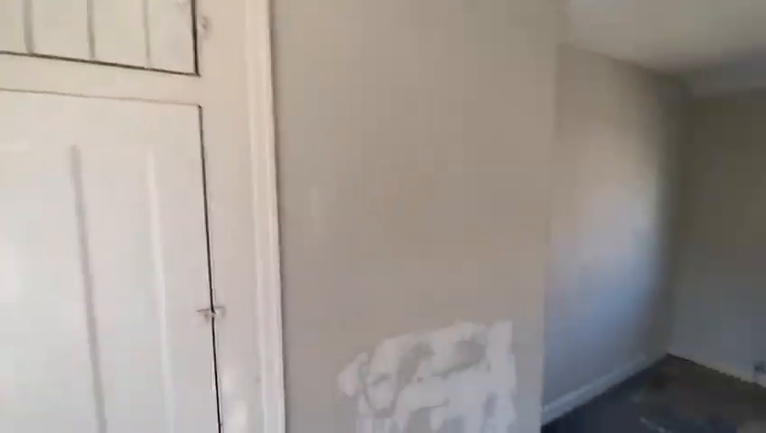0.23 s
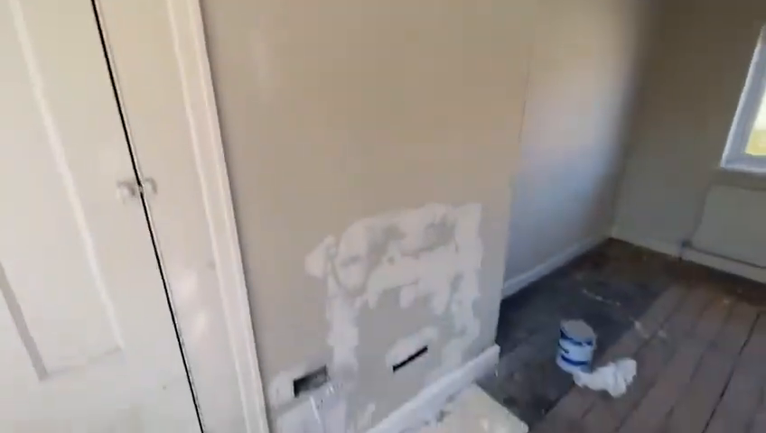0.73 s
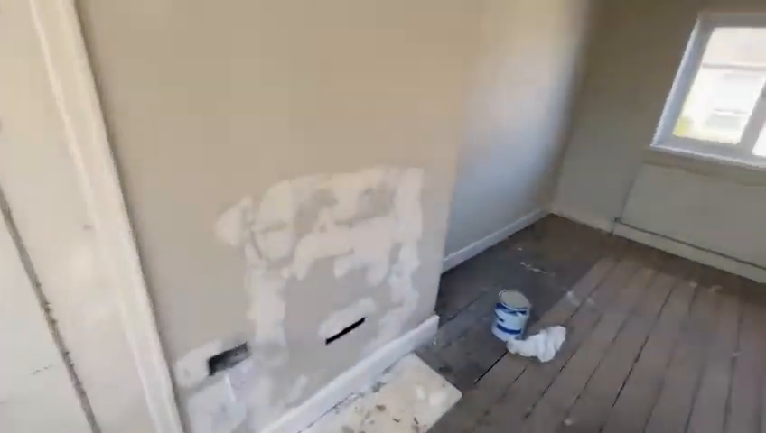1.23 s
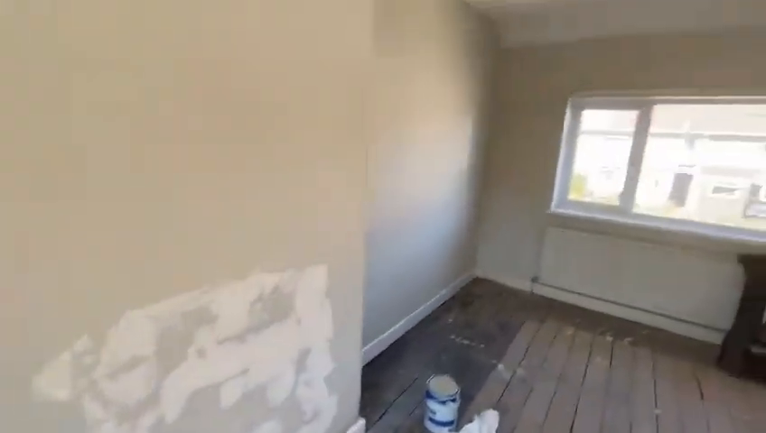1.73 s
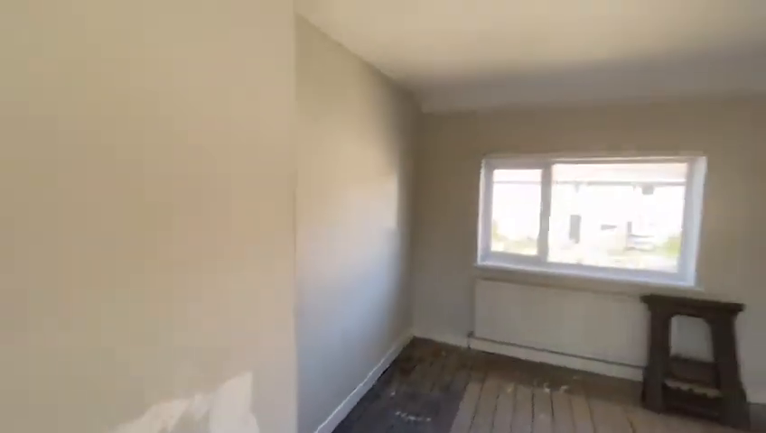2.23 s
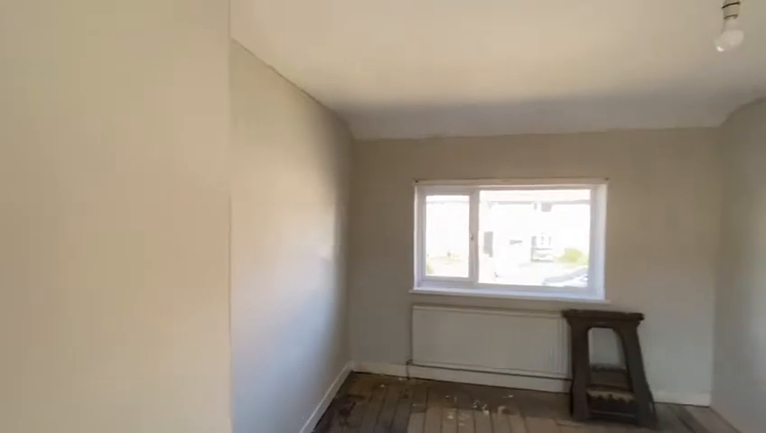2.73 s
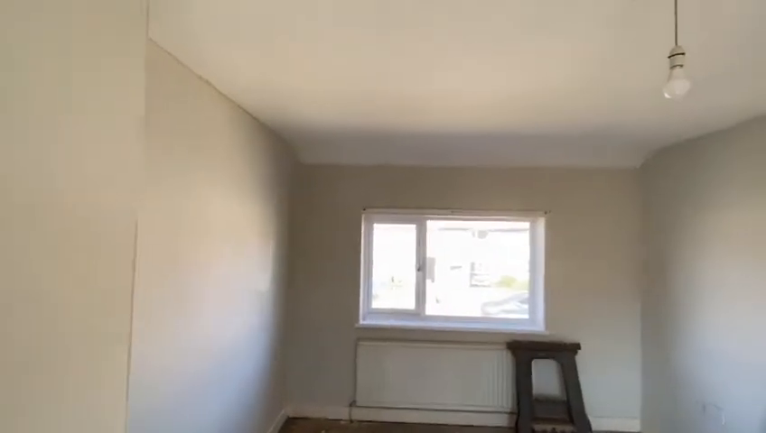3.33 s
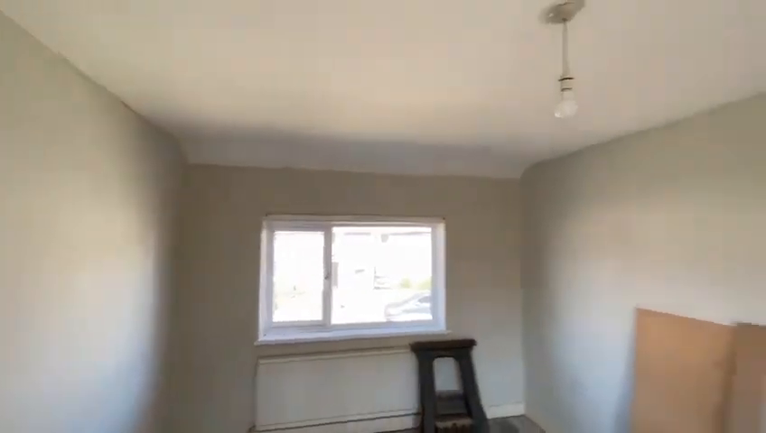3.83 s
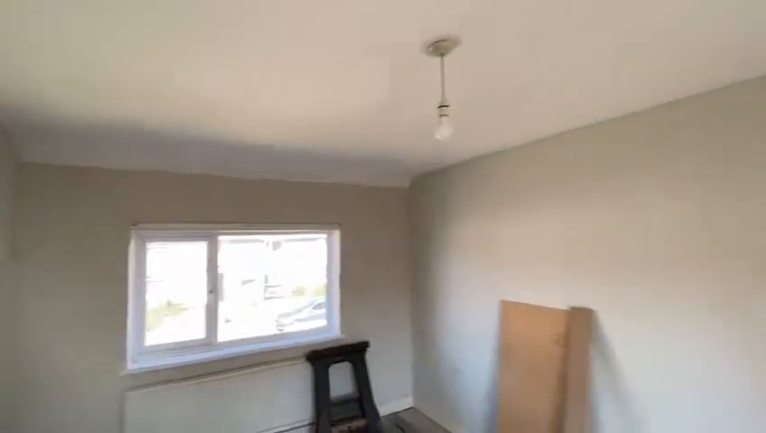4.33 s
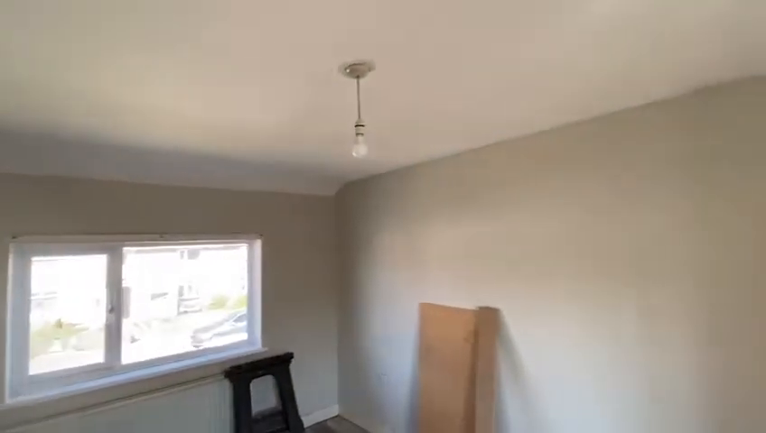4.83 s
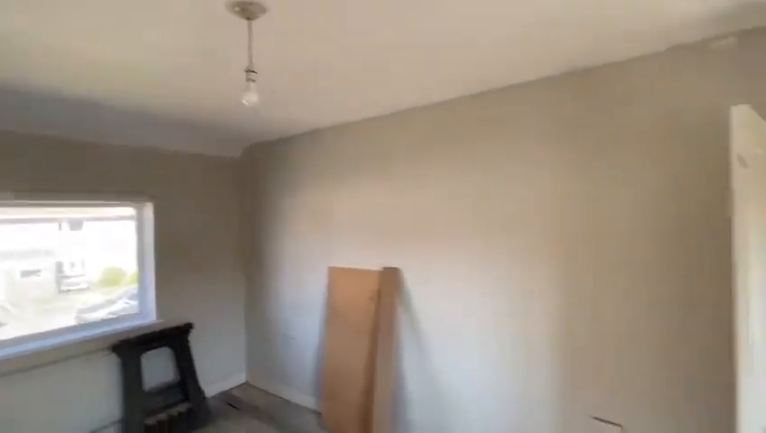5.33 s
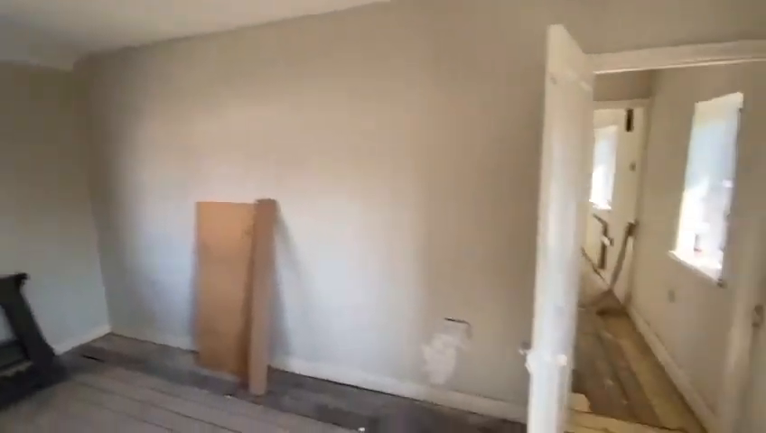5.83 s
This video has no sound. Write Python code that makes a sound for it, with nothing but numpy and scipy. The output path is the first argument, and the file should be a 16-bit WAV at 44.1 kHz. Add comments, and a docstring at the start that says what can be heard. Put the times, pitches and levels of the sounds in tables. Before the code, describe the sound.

Slow, uneven footsteps thump and knock on a wooden floor, close to the microphone and ringing off bare plaster walls. The first step is heavy; the next are softer, with soles scraping over grit and a faint rustle of clothing. A louder run of knocks, crunches and dry clacks follows as a loose board shifts. Then the empty house grows still, apart from a brief low creak, a very faint high whistle and a light final step.

```python
"""Slow footsteps on bare floorboards, as someone carries a camera through an empty, ringing room.
Each step thuds in the joists and knocks in a board; soles scrape over grit, a loose board crunches and
clacks, and another groans as it bends. Bare plaster walls throw it all back. Clothes rustle between the
steps, faint tones swell in the pauses, and near the end a thin whistle, perhaps a bird, comes from
outside. Under everything lies the still air of the house."""
import sys
import numpy as np
from scipy import signal
from scipy.fft import rfft, irfft, next_fast_len
from scipy.io import wavfile
from scipy.ndimage import uniform_filter1d

SR = 44100
rng = np.random.default_rng(int(sys.argv[2]) if len(sys.argv) > 2 else 0)


def generate_wav(signal):
    """Clip the signal to [-1, 1] and save it as 16-bit WAV at the path in sys.argv[1]."""
    frames = np.transpose(np.atleast_2d(signal))
    scaled = np.clip(frames, -1, 1) * 32767
    pcm = np.round(scaled).astype(np.int16)
    wavfile.write(sys.argv[1], SR, pcm)


N = 267951
TIME = np.arange(N) / SR

# Event levels are set ahead of the planks' resonance and the direct and wall sends.
# weight landing on the floor: start_s, level_db, contact_s, pitch_factor
THUDS = [(.001, -20.5, 0.008, 1.06), (0.166, -40, 0.017, 1.6), (0.503, -46.5, 0.0026, 1),
         (.655, -44.5, 0.0034, 0.78), (0.858, -44, 0.007, 0.64), (1.611, -48.5, 0.0031, 0.98),
         (2.088, -50.5, 0.0046, 0.96), (2.145, -42, 0.0039, 0.69), (2.218, -42, 0.01, 0.64),
         (2.289, -46.5, 0.0083, 0.58), (2.53, -51, 0.012, 1.35), (2.659, -50, 0.0021, 1.06),
         (2.984, -39.5, 0.0058, 0.88), (3.088, -46, 0.0092, 0.84), (3.229, -33.5, 0.0017, 1.81),
         (3.706, -28.5, 0.0051, 1.1), (3.735, -26, 0.0039, 1.05), (3.968, -37, 0.0026, 1.9),
         (3.999, -34.5, 0.0039, 1.8), (4.063, -40.5, 0.0039, 1.7), (4.44, -50, 0.0035, 1.16),
         (5.891, -66, 0.0062, 1.2)]
# modes of the sprung floor, at pitch factor 1: pitch_hz, level_db, t60_s
JOIST_MODES = [(42.9, -14, 1), (66, 0, 0.3), (80.9, -8, 0.64), (101.4, 0.5, 0.14), (137.4, -5, 0.33),
               (191.4, 0.5, 0.082), (266.2, 0.5, 0.23)]
# weight rolling from heel to toe: full_load_s, level_db, fade_db_per_s
ROLLS = [(.01, -19.5, 150), (2.17, -45, 68), (2.98, -41.5, 166), (3.16, -51.5, 140), (3.67, -29, 85),
         (5.91, -49, 89)]
# heel or toe knocking on a board: start_s, level_db, pitch_factor, wall_send_db
KNOCKS = [(.007, -25, 0.82, -0.5), (0.09, -33.5, 1.04, -2), (0.174, -31.5, 1.06, -1.5),
          (0.648, -37, 0.74, -9), (0.675, -40, 0.98, -9), (0.862, -43, 0.85, -4), (1.598, -51, 0.69, -8),
          (2.079, -37.5, 0.96, -2), (2.167, -40, 0.96, -2.5), (2.203, -38.5, 1.23, -4.5),
          (2.951, -39, 1.16, -7.5), (3.231, -13, 1.01, -9.5), (3.641, -25.5, 1.01, -6),
          (3.709, -26, 1.04, -12), (3.741, -27, 1.04, -6), (3.995, -29.5, 0.83, -3),
          (4.335, -47, 0.94, -2.5), (4.635, -53, 1.06, -3), (5.48, -51.5, 0.94, -7), (5.875, -44, 0.79, -6),
          (5.947, -54, 1, -10)]
# modes of one board, at pitch factor 1: pitch_hz, level_db, t60_s
BOARD_MODES = [(181, -25, 0.089), (270, -15, 0.29), (334.8, 2.5, 0.11), (387.4, -3.5, 0.099),
               (435, -17.5, 0.23), (558, -14.5, 0.12), (745, -24.5, 0.35), (799, -18, 0.56),
               (817, -24, 0.54), (895, -22.5, 0.35), (1100, -38, 0.1), (1610, -31, 0.1)]
# hard clacks of loose wood and grit: start_s, level_db, decay_s, tilt_db_per_octave, low_cut_hz
CLACKS = [(.636, -39, 0.0086, -4.5, 218), (.858, -45, 0.0077, -6, 500), (1.599, -52.5, 0.014, -8, 714),
          (2.063, -39.5, 0.0067, -19, 487), (2.165, -39.5, 0.0034, -16, 660),
          (2.925, -50, 0.025, -0.5, 300), (2.946, -44, 0.024, -5, 298), (3.222, -37, 0.014, -2, 302),
          (3.233, -32.5, 0.011, -7, 484), (3.709, -37.5, 0.0074, -1, 5500), (3.86, -39, 0.0064, -6, 5000),
          (3.9644, -24, 0.0075, -0.5, 346), (3.994, -18.5, 0.0055, 1.5, 246),
          (4.013, -27, 0.0019, -13, 198), (4.023, -28, 0.0054, -7, 248), (4.099, -22.5, 0.0029, 0, 335),
          (4.3238, -30, 0.0022, -4, 1547), (4.328, -31, 0.0048, -3.5, 2900),
          (4.622, -46.5, 0.0066, -8.5, 980), (4.675, -56.5, 0.0096, -44, 390),
          (5.857, -55.5, 0.044, -0.5, 295), (5.9, -58, 0.018, 1.5, 398)]
# tone of wood slapping wood: frequency_hz, gain_db
CLACK_COLOUR = [(60, -23), (150, -3), (300, 10.5), (700, 4.5), (1400, 2), (2100, -1), (2750, -5.5),
                (3300, -5.5), (4500, -11.5), (7000, -9), (9000, -16), (11500, -21)]
# dry wood and grit cracking under the sole: start_s, level_db, pitch_hz, decay_s
CRACKS = [(0.6375, -36, 2320, .002), (0.644, -38, 1580, 0.0038), (.865, -36.5, 960, 0.0033),
          (2.0655, -42, 553, .005), (2.165, -45.5, 920, 0.0023), (2.9246, -50, 1880, 0.0033),
          (3.233, -30.5, 1610, .004), (3.617, -31.5, 2490, 0.0025), (3.714, -32.5, 7570, .002),
          (3.864, -44, 6940, .002), (3.965, -24.5, 1700, .0016), (3.9935, -20, 1090, 0.00093),
          (3.9959, -22, 3860, 0.002), (3.9998, -24.5, 1590, .001), (4.0123, -24, 1290, 0.0022),
          (4.0244, -28, 1150, 0.0014), (4.038, -21.5, 1360, .0012), (4.101, -25, 2100, 0.0024),
          (4.151, -46, 3500, .0015), (4.1995, -43, 3030, .0015), (4.324, -29.5, 1800, 0.0017),
          (4.3304, -27, 4250, 0.001)]
# partials of a crack: pitch_factor, level_db
CRACK_MODES = [(.72, -1.5), (1, 1.5), (1.31, -6.5), (1.83, -9.5)]
# soles sliding on the boards: start_s, attack_s, length_s, level_db, brightness (0 to 1)
SCRAPES = [(0, 0.0026, 0.011, -34.5, 0.55), (0.044, .01, 0.024, -37.5, 0),
           (0.096, 0.0077, 0.089, -40, 0.08), (0.465, 0.0087, 0.08, -51.5, 1),
           (0.633, 0.0049, 0.048, -37.5, 0.87), (0.693, 0.047, 0.13, -41, 0.75),
           (.82, 0.011, 0.04, -44, 0.86), (1.583, 0.016, 0.058, -53, 0.6), (2.363, 0.097, 0.21, -54, 0.06),
           (3.585, 0.0034, 0.03, -33, 0.13), (3.61, 0.0035, 0.064, -33, 0.25),
           (3.705, 0.0056, 0.013, -29, 0.4), (3.719, 0.016, 0.068, -45, 0),
           (3.857, 0.0065, 0.014, -36, 0.8), (3.965, 0.029, 0.03, -30, 0.2),
           (3.983, 0.0036, 0.023, -32, 0.4), (4.04, .01, 0.094, -50, 0.5), (4.178, 0.041, 0.078, -44.5, 1)]
# tone of a sole rubbing on wood: frequency_hz, gain_db
SOLE_COLOUR = [(60, -70), (200, 9.5), (400, 6.5), (800, 1), (1200, 2), (1700, 0.5), (2800, -1),
               (5000, -8.5), (7200, -11.5), (8500, -19), (11500, -18.5)]
# a loaded board crunching against its neighbours: start_s, length_s, level_db, slips_per_s
CRUNCHES = [(3.599, 0.092, -35.5, 820), (3.612, 0.043, -39, 1000), (3.712, 0.08, -32.5, 600),
            (3.975, 0.033, -34, 700)]
# resonances of the crunching board: pitch_hz, width_hz, gain_db
CRUNCH_MODES = [(205, 23, -9), (250, 14, -1.5), (362, 21, 7.5), (437, 20, -8.5), (564, 17, -1),
                (825, 70, -4), (1137, 140, -3.5), (1308, 46, 1), (1670, 18, -7.5), (2120, 55, -6),
                (2490, 110, -9), (3720, 64, -15.5), (4890, 50, -12)]
# resonances of the planks by the cupboard, where the walk begins: pitch_hz, width_hz, gain_db
CUPBOARD_PLANKS = [(245, 39, 5), (307, 39, -14), (398, 24, -1), (549, 24, 1.5), (930, 22, -4),
                   (1069, 31, 4), (1594, 50, -2), (1924, 65, 0), (2240, 82, -5), (2900, 390, -9),
                   (5100, 1000, -8)]
# resonances of the planks in the middle of the room: pitch_hz, width_hz, gain_db
MID_ROOM_PLANKS = [(342, 8.7, -17.5), (564, 15, -16), (630, 19, -14), (770, 120, -9), (965, 22, -9),
                   (1144, 15, -8), (1228, 21, -7), (1380, 16, -16.5), (1442, 18, -3.5), (1717, 41, -2.5),
                   (2010, 67, -8.5), (3830, 210, -16), (5000, 680, -3.5)]
# cloth brushing as a leg or arm swings: peak_s, level_db, length_factor
BRUSHES = [(.02, -49, 1), (.5, -54, 1.5), (1.48, -60.5, 1.13), (1.629, -60, 1.2), (1.8, -58.5, 0.37),
           (1.91, -64.5, 0.71), (2.15, -57.5, 1.4), (2.45, -55.5, 1.94), (2.96, -56.5, 0.41),
           (3.14, -57.5, 1.2), (3.33, -52.5, 1.57), (5.26, -68.5, 1.46), (5.49, -63, 1.04),
           (5.91, -68.5, 1)]
# tone of rubbing cloth: frequency_hz, gain_db
CLOTH_COLOUR = [(40, 7.5), (120, 2.5), (220, 7.5), (340, 4), (700, 1.5), (1400, -2), (2100, -2),
                (3000, -5.5), (5000, -10), (7000, -10.5), (9000, -18), (11500, -20)]
# upward swoops of the whistle: peak_s, rise_hz
SWOOPS = [(5.513, 590), (5.583, 340), (5.648, 730), (5.697, 730), (5.822, 925)]
# faint thin tones in the pauses: peak_s, half_length_s, pitch_hz, filter_width_hz, level_db
FAINT_TONES = [(1.06, 0.076, 2080, 190, -64), (1.258, 0.068, 2026, 150, -66), (1.479, 0.05, 1990, 200, -70),
               (2.513, .035, 11100, 450, -74), (2.808, .025, 11100, 450, -69),
               (3.384, .03, 11000, 700, -68), (3.386, .04, 7050, 140, -72), (5.002, 0.12, 2080, 200, -77.5),
               (5.0, 0.13, 1134, 181, -73.5)]
# reverb time of the bare room: frequency_hz, t60_s
ROOM_T60 = [(60, 0.38), (150, 0.64), (350, 0.5), (550, 1), (1000, 0.95), (2000, 0.99), (4500, 0.9),
            (8000, 0.56), (11500, 0.43)]
# standing waves between the walls: pitch_hz, t60_s, gain_db
STANDING_WAVES = [(378, 0.22, -4), (525, 0.76, -16), (625, 0.92, -2), (766, 0.93, -18.5)]
# room tone of the house: frequency_hz, gain_db
AIR_COLOUR = [(15, -23), (40, 4.5), (100, 8), (200, -3), (350, -6), (700, -14), (1150, -9.5), (2100, -14),
              (3500, -23), (7000, -26.5), (9000, -35), (11500, -38)]
# stereo width of diffuse sound: frequency_hz, side_gain_db
STEREO_WIDTH = [(20, -26), (60, -19), (130, -5), (350, -4), (500, -2), (700, 0), (11000, 0)]
# tonal lean between the two microphone ports: frequency_hz, left_minus_right_db
PORT_BALANCE = [(60, 2.5), (150, -4), (400, 0.5), (900, 1), (2000, -0.5), (4000, 2), (8000, 3.5),
                (11000, -2)]


def thuds():
    """Body weight sets the joists swinging; a softer landing leaves only the lowest modes."""
    out = np.zeros(N)
    for start, db, contact_s, pitch_factor in THUDS:
        add(out, start, amp(db) * strike(JOIST_MODES, pitch_factor, contact_s))
    return sends(out, direct_db=-2.5, wall_db=-5.5)


def rolling():
    """A rolling foot's uneven push keeps the joists rumbling: the load builds, eases and lifts off."""
    roll_s, ramp_db_per_s = 0.34, 229
    joists = strike(JOIST_MODES, pitch_factor=0.92, contact_s=0.0042)
    rumble = unit(signal.fftconvolve(rng.standard_normal(N + SR), joists)[SR:SR + N])
    load = np.zeros(N)
    for full_load_s, db, fade in ROLLS:
        t = TIME - full_load_s
        outside_roll_s = np.maximum(-t, 0) + np.maximum(t - roll_s, 0)
        load += amp(db - fade * np.maximum(t, 0) - ramp_db_per_s * outside_roll_s)
    return sends(rumble * load, direct_db=-9, wall_db=-11.5)


def knocks():
    """Heel or toe raps a board and two close modes beat, hollow; boards right underfoot sound drier."""
    direct, to_walls = np.zeros((2, N))
    for start, db, pitch_factor, wall_db in KNOCKS:
        knock = amp(db) * strike(BOARD_MODES, pitch_factor, contact_s=0.0007)
        add(direct, start, amp(-6.5) * knock)
        add(to_walls, start, amp(wall_db) * knock)
    return np.array([direct, to_walls])


def clacks():
    """Wood slaps wood: a quick, toneless burst, heard mostly off the walls; small pieces give no bass."""
    out = np.zeros(N)
    lead_s = 0.02
    t = np.maximum(np.arange(SR // 5) / SR - lead_s, 0)
    seating = 1 - np.exp(-t / 0.00052)  # the faces take a moment to meet
    for start, db, decay_s, tilt_db, low_cut_hz in CLACKS:
        envelope = seating * np.exp(-t / decay_s)
        spectrum = rfft(envelope * rng.standard_normal(len(t)))
        toneless = irfft(np.exp(1j * np.angle(spectrum)))  # every frequency equally strong
        low_cut = signal.butter(3, low_cut_hz, "high", fs=SR, output="sos")
        burst = signal.sosfilt(low_cut, colour(toneless, CLACK_COLOUR, tilt_db))
        burst *= np.linalg.norm(envelope) / np.linalg.norm(burst)
        add(out, start - lead_s, amp(db) * burst)
    return sends(planks(out), direct_db=-6.5, wall_db=0.5)


def cracks():
    """A splinter or grain gives way at once and rings for a few cycles."""
    out = np.zeros(N)
    t = np.arange(SR // 30) / SR
    for start, db, hz, decay_s in CRACKS:
        partials = sum((-1) ** k * amp(mode_db) * np.sin(2 * np.pi * hz * factor * t)
                       for k, (factor, mode_db) in enumerate(CRACK_MODES))
        ping = partials * np.exp(-t / decay_s)
        add(out, start, amp(db) * ping / abs(ping).max())
    return sends(out, direct_db=-3, wall_db=-3)


def scrapes():
    """Soles drag grit over the grain, catching and slipping; a lighter, faster slide is brighter."""
    out = np.zeros(N)
    sag_db, release_s = -3.5, 0.0091  # the sole eases off along the stroke, then lifts
    for start, attack_s, length_s, db, brightness in SCRAPES:
        t = np.arange(0, length_s + 0.1, 1 / SR)
        catch_db = 2 * wobble(len(t), smooth_samples=250)
        fine = unit(grit(len(t), per_s=2000, spread_db=0.5, hiss=0.61))
        slips = (0.592 * fine + 0.403 * coarse_grit(len(t))) * amp(catch_db)
        dull = unit(colour(slips, SOLE_COLOUR, tilt_db=-4))
        bright = unit(colour(slips, SOLE_COLOUR, tilt_db=3))
        rub = (1 - brightness) * dull + brightness * bright
        pressure = np.minimum(t / attack_s, 1) * np.exp(-np.maximum(t - length_s, 0) / release_s)
        add(out, start, amp(db + sag_db * t / length_s) * pressure * rub)
    travelling = drifting(out, depth_db=2.2)  # resonances shift as the foot crosses the boards
    return sends(planks(travelling), direct_db=-11, wall_db=-4)


def coarse_grit(count):
    """Larger grains, each ringing briefly at its own pitch; every stroke meets other grains."""
    grain_q = 18
    pitches_hz = np.geomspace(450, 9000, 26) * rng.uniform(0.95, 1.05, 26)
    return unit(sum(resonate(grit(count, per_s=90, spread_db=3, hiss=0), hz, hz / grain_q)
                    for hz in pitches_hz))


def judder():
    """A rubber sole grips and lets go as it lands: a quick, uneven train of slips shakes the planks."""
    start_s, length_s, level_db, slip_hz = 0.636, 0.069, -43, 235.3
    out = np.zeros(N)
    t = np.arange(SR // 8) / SR
    rate_hz = slip_hz * (1 + 0.12 * wobble(len(t), smooth_samples=150))
    slips = np.diff(np.floor(np.cumsum(rate_hz) / SR), prepend=-1)  # one click a cycle
    grip = np.sqrt(np.maximum(np.sin(np.pi * np.minimum(t / length_s, 1)), 0))
    add(out, start_s, amp(level_db) * grip * unit(colour(slips, SOLE_COLOUR, tilt_db=-1)))
    return sends(planks(out), direct_db=-11, wall_db=-11)


def crunches():
    """Under weight, a board gives way in a swelling run of small uneven slips, each ringing its modes."""
    out = np.zeros(N)
    for start, length_s, db, per_s in CRUNCHES:
        t = np.arange(0, length_s, 1 / SR)
        slips = grit(len(t), per_s, spread_db=1.5, hiss=0.45)
        wood = unit(sum(amp(gain_db) * resonate(slips, hz, width) for hz, width, gain_db in CRUNCH_MODES))
        rub = amp(-10) * unit(colour(slips, SOLE_COLOUR))
        add(out, start, amp(db) * np.sin(np.pi * t / length_s) * (wood + rub))
    return sends(out, direct_db=-11.5, wall_db=-8)


def groan():
    """A board slips slowly against its nails: a low tone and dry rasp, rising and falling with load."""
    start_s, length_s, level_db = 5.485, 0.145, -47.5
    unloaded_hz, bend_share = 94, 0.133
    load = np.sin(np.pi * np.clip((TIME - start_s) / length_s, 0, 1)) ** 0.71
    waver = 1 + 0.2 * wobble(N, smooth_samples=300)
    phase = 2 * np.pi * np.cumsum(unloaded_hz * (1 + bend_share * load) * waver) / SR
    tone = unit(np.sin(phase) + 0.2 * np.sin(2 * phase) + 0.09 * np.sin(3 * phase))
    friction = (1 + np.sin(phase)) * rng.standard_normal(N)
    rasp = unit(resonate(resonate(friction, hz=517, width_hz=650), hz=520, width_hz=650))
    return sends((tone + amp(-18.5) * rasp) * amp(level_db) * load, direct_db=-7.5, wall_db=-14)


def planks(x):
    """The boards underfoot ring along with whatever rubs or strikes them."""
    by_cupboard = TIME < 1.9
    places = ((CUPBOARD_PLANKS, x * by_cupboard), (MID_ROOM_PLANKS, x * ~by_cupboard))
    return x + sum(amp(db) * resonate(part, hz, width)
                   for modes, part in places for hz, width, db in modes)


def clothes():
    """Fibres catch and let go in swells with the stride; the colour wavers slightly in random patches."""
    fibres = np.array([grit(N, per_s=4300, spread_db=1.5, hiss=1.3) for _ in range(2)])
    rustle = colour(drifting(fibres, depth_db=1.9), CLOTH_COLOUR)
    return unit(diffuse(rustle)) * limb_swings()


def limb_swings():
    """Gain of the rustle: a low bed that settles as the walker stops, and a swell for each swing."""
    bed_db, walk_end_s, settle_db_per_s = -64, 4.47, 34
    rise_s, fall_s = 0.06, 0.092  # a swing gathers speed faster than it dies away
    power = amp(bed_db - settle_db_per_s * np.maximum(TIME - walk_end_s, 0)) ** 2
    for peak_s, db, length_factor in BRUSHES:
        reach_s = length_factor * np.where(TIME < peak_s, rise_s, fall_s)
        swell = amp(db) / (1 + ((TIME - peak_s) / reach_s) ** 2)
        power += swell ** 2
    return np.sqrt(power)


def whistle():
    """A faint pure tone swoops up from its resting pitch and back, growing louder as it climbs."""
    rest_hz, rest_db, db_per_hz, half_swoop_s = 6900, -89.5, 0.0289, 0.028
    rise_hz = sum(hz * np.exp(-((TIME - peak_s) / half_swoop_s) ** 2) for peak_s, hz in SWOOPS)
    sounding = (TIME > SWOOPS[0][0] - 2 * half_swoop_s) & (TIME < SWOOPS[-1][0] + 2 * half_swoop_s)
    gate = uniform_filter1d(sounding.astype(float), size=900)
    tone = unit(np.sin(2 * np.pi * np.cumsum(rest_hz + rise_hz) / SR))
    return sends(tone * gate * amp(rest_db + db_per_hz * rise_hz), direct_db=-19, wall_db=-14)


def faint_tones():
    """Narrow bands of noise swell and fade, a faint ringing in the pauses."""
    out = np.zeros((2, N))
    t = np.arange(SR) / SR - 0.5
    for peak_s, half_length_s, hz, width, db in FAINT_TONES:
        band = resonate(resonate(rng.standard_normal((2, SR)), hz, width), hz, width)
        swell = amp(db) * np.exp(-(t / half_length_s) ** 2 / 2)
        for channel, tone in zip(out, swell * unit(diffuse(band))):
            add(channel, peak_s - 0.5, tone)
    return out


def room(direct, to_walls):
    """Direct sound plus reflections, whose pattern changes as the walker moves between two spots."""
    sweep_hz = 0.8
    angle = 2 * np.pi * sweep_hz * TIME
    feeds = to_walls * np.array([np.cos(angle), np.sin(angle)])
    size = next_fast_len(N + SR)
    reverb_spectrum = (rfft(feeds, size) * rfft(reflections(), size)).sum(axis=1)
    return direct + irfft(reverb_spectrum, size)[:, :N]


def reflections():
    """Dense echoes off bare plaster, each band dying at its own speed, with standing waves on top."""
    shape = (2, 2, SR)  # channels, spots, samples
    echoes = rng.standard_normal(shape) * (rng.random(shape) < 0.15)
    band_hz, t, bands = signal.stft(echoes, SR, nperseg=256)
    decay = amp(-60 * t / curve_at(ROOM_T60, band_hz)[:, None])
    tails = signal.istft(bands * decay, SR, nperseg=256)[1][..., :SR]
    # even out the colour, so that each band's energy follows its reverb time
    spectrum = rfft(tails, 2 * SR)
    power = uniform_filter1d(abs(spectrum) ** 2, size=130)
    t60_s = curve_at(ROOM_T60, np.fft.rfftfreq(2 * SR, 1 / SR))
    tails = irfft(spectrum * np.sqrt(t60_s / power))[..., :SR]
    standing = sum(amp(db) * resonate(tails, hz, width_hz=np.log(1000) / np.pi / ring_s)
                   for hz, ring_s, db in STANDING_WAVES)
    onset = np.clip((TIME[:SR] - 0.003) / 0.00032, 0, 1)  # the first echo comes after 3 ms
    return diffuse((tails + standing) * onset)


def air():
    """The still background of the house: a soft, bass-heavy room tone."""
    return amp(-69.5) * unit(diffuse(colour(rng.standard_normal((2, N)), AIR_COLOUR)))


def strike(modes, pitch_factor, contact_s):
    """Decaying modes of alternating sign, pushed by a smooth force pulse; peak 1."""
    t = np.arange(SR // 2) / SR
    ring = sum((-1) ** k * amp(db - 60 * t / t60) * np.sin(2 * np.pi * hz * pitch_factor * t)
               for k, (hz, db, t60) in enumerate(modes))
    force = np.sin(np.pi * np.minimum(t[:SR // 20] / contact_s, 1)) ** 2
    hit = signal.fftconvolve(ring, force)[:len(t)]
    return hit / abs(hit).max()


def grit(count, per_s, spread_db, hiss):
    """Tiny slips of uneven size over a smooth hiss."""
    sizes = amp(spread_db * np.minimum(rng.exponential(1, count), 4))
    slipping = rng.random(count) < per_s / SR
    return unit(sizes * slipping * rng.standard_normal(count)) + hiss * rng.standard_normal(count)


def drifting(x, depth_db):
    """The colour wavers in random patches of a few hundred Hz and a few hundredths of a second."""
    bands = signal.stft(x, SR, nperseg=1024)[2]
    speckle = rng.standard_normal(bands.shape[-2:])
    patches = unit(uniform_filter1d(uniform_filter1d(speckle, size=5, axis=0), size=6, axis=1))
    return signal.istft(bands * unit(amp(depth_db * patches)), SR, nperseg=1024)[1][..., :N]


def wobble(count, smooth_samples):
    """A smoothed random waver of rms 1."""
    return unit(uniform_filter1d(rng.standard_normal(count), size=smooth_samples))


def resonate(x, hz, width_hz):
    """One resonance of gain 1."""
    return signal.lfilter(*signal.iirpeak(hz, hz / width_hz, fs=SR), x)


def colour(x, curve, tilt_db=0):
    """Equalises by a curve, plus a tilt per octave that pivots at 1.5 kHz and levels off below 300 Hz."""
    size = next_fast_len(x.shape[-1])
    hz = np.fft.rfftfreq(size, 1 / SR)
    octaves = np.log2(np.maximum(hz, 300) / 1500)
    gain = amp(curve_at(curve, hz) + tilt_db * octaves)
    return irfft(rfft(x, size) * gain, size)[..., :x.shape[-1]]


def diffuse(pair):
    """Two unrelated signals become a diffuse field: alike in the bass, unrelated in the treble."""
    mid, side = pair[0], colour(pair[1], STEREO_WIDTH)
    return np.array([mid + side, mid - side])


def sends(x, direct_db, wall_db):
    """Splits a source into the part heard directly and the part that goes by way of the walls."""
    return np.array([amp(direct_db) * x, amp(wall_db) * x])


def curve_at(curve, hz):
    """Reads a curve on a log-frequency axis."""
    points_hz, values = np.transpose(curve)
    return np.interp(np.log(hz + 1), np.log(points_hz + 1), values)


def add(mix, start_s, sound):
    """Lays a sound into the mix."""
    part = mix[max(round(start_s * SR), 0):][:len(sound)]
    part += sound[:len(part)]


def amp(db):
    """Decibels to gain."""
    return 10 ** (np.asarray(db) / 20)


def unit(x):
    """Scales to rms 1."""
    return x / np.sqrt(np.mean(x ** 2) + 1e-20)


def scene():
    """Footsteps and whistle ring through the room; clothes, faint tones and air bypass the reverb."""
    impacts = thuds() + rolling() + knocks() + clacks() + cracks()
    friction = scrapes() + judder() + crunches() + groan()
    direct, to_walls = impacts + friction + whistle()
    return room(direct, to_walls) + clothes() + faint_tones() + air()


def record(dry):
    """Each microphone port has its own colour; the recorder's band limit cuts the top treble."""
    band_limit_hz = 11750
    balance = np.array(PORT_BALANCE)
    left = colour(dry[0], balance * (1, 0.5))
    right = colour(dry[1], balance * (1, -0.5))
    low_pass = signal.firwin(511, band_limit_hz, window=("kaiser", 9), fs=SR)
    return signal.oaconvolve(np.array([left, right]), low_pass[None], "same")


dry = scene()
out = record(dry)
generate_wav(out)
```